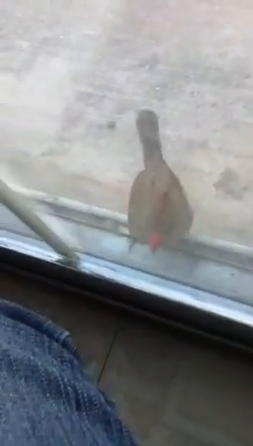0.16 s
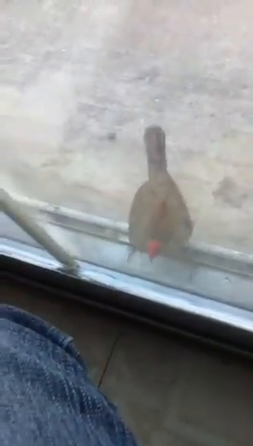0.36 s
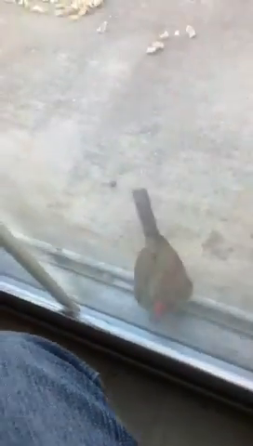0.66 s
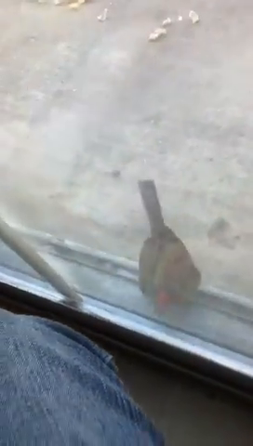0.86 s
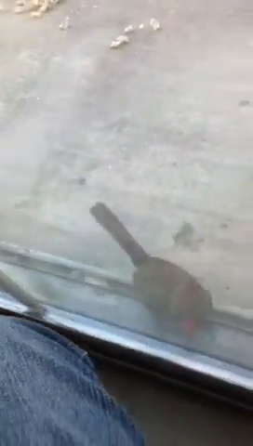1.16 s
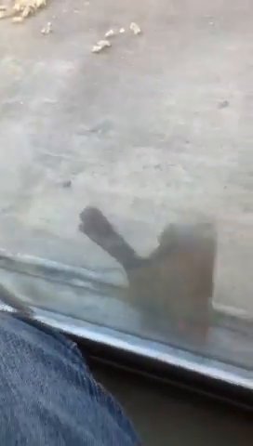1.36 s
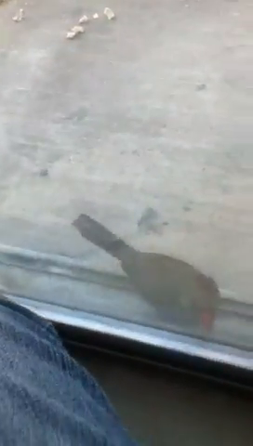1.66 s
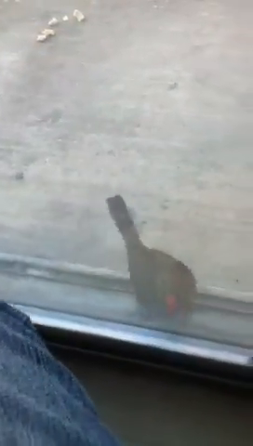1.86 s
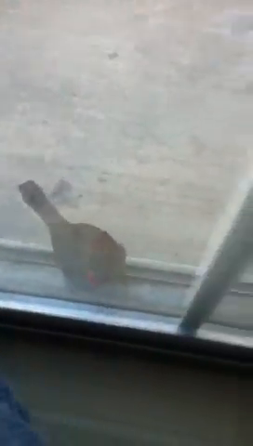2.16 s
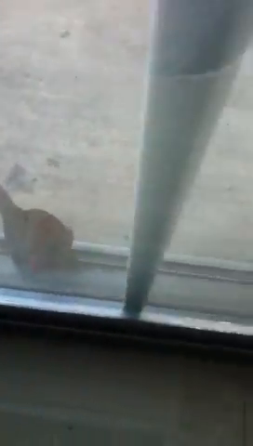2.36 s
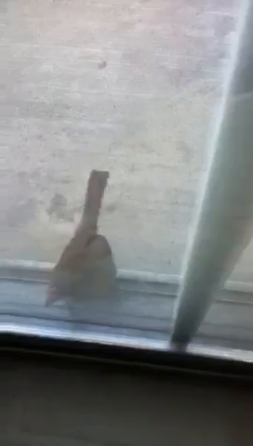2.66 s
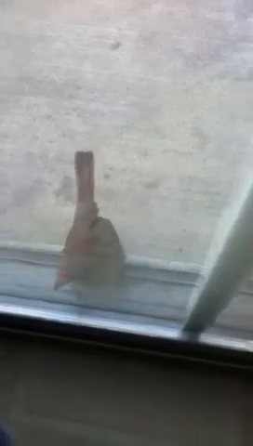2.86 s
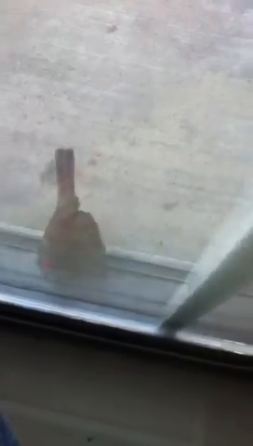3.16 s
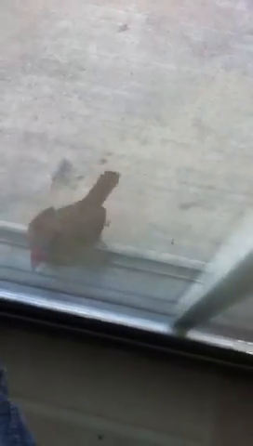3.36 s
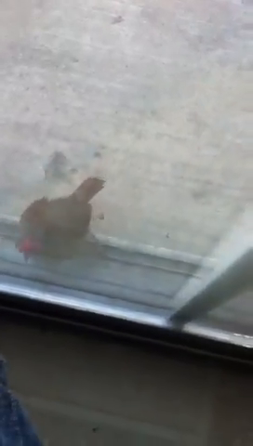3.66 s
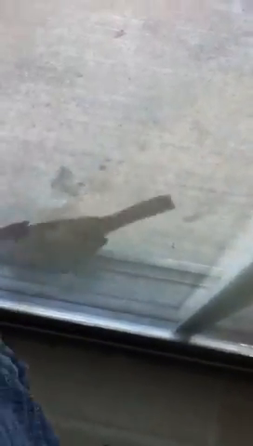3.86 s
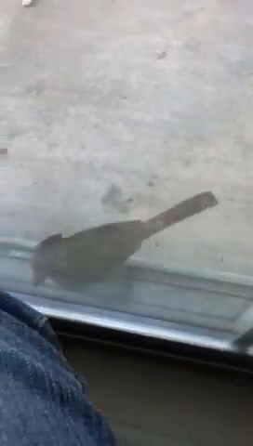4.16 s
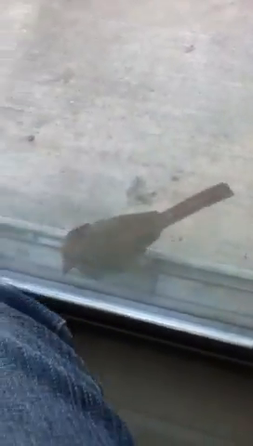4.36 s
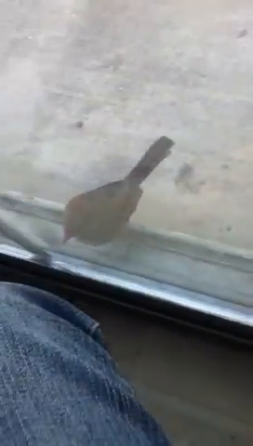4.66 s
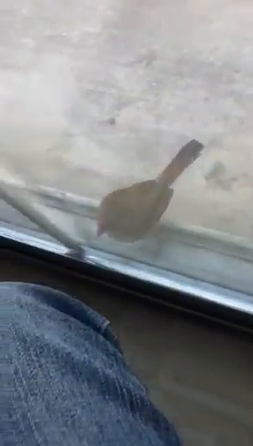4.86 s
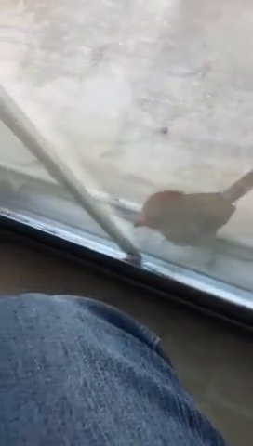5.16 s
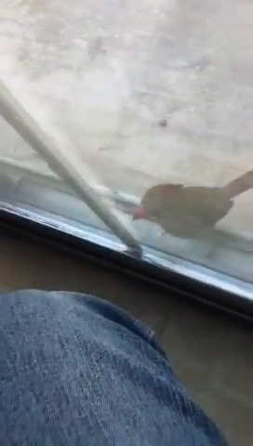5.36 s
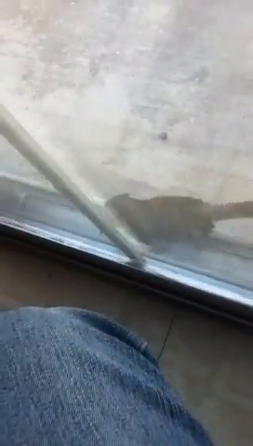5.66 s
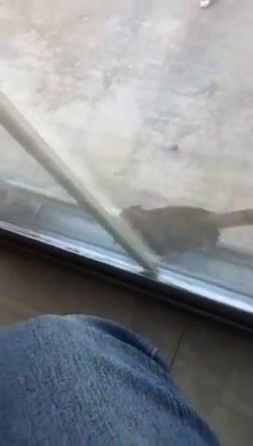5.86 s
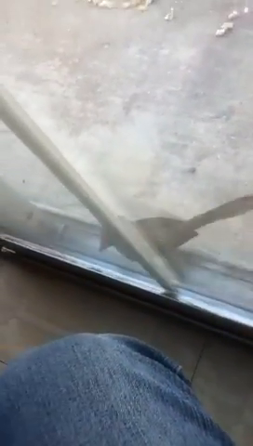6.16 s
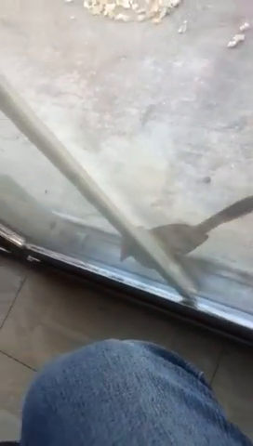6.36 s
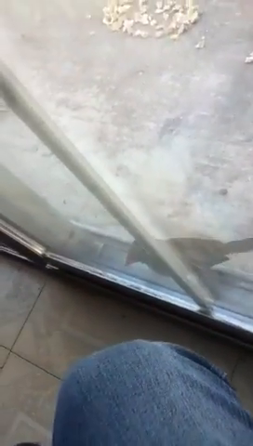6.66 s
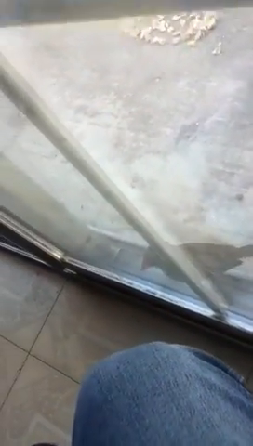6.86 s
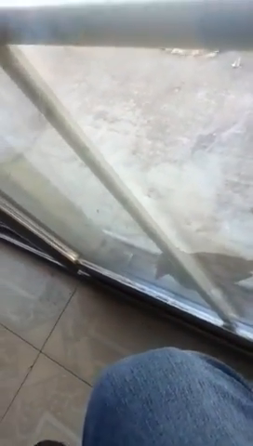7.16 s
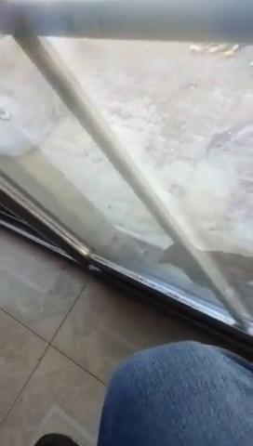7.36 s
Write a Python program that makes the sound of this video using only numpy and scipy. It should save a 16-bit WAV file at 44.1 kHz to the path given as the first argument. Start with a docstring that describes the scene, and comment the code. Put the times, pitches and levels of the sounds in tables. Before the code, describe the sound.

Heard from a phone just inside a glass door, a low electrical hum and soft room noise run throughout. Close by, a bird taps its beak unevenly on the pane, its claws ticking on metal and its wings brushing briefly. Muffled paired thuds indoors fade out and are followed by a single loud knock at the door frame. More pecks follow, then a few faint scuffs from farther into the room.

```python
"""Just inside a glass door, a phone microphone picks up steady mains hum and soft room noise.
Outside, a bird starts pecking: bending waves cross the pane and return as tiny falling chirps,
while claws tick on the metal sill, wings flick and the frame pings. Indoors, soft double thuds
on the floor die away, then one hard knock sounds by the door. The bird pecks on, and near the end
a few scuffs come from farther into the room."""
import sys
import numpy as np
from scipy import signal
from scipy.fft import rfft, irfft, next_fast_len
from scipy.io import wavfile
from scipy.ndimage import uniform_filter1d

SR = 44100
rng = np.random.default_rng(int(sys.argv[2]) if len(sys.argv) > 2 else 0)


def to_wav(sig):
    """Store sig (one row per channel, or 1-D mono) as 16-bit WAV at the path in sys.argv[1].

    Samples outside -1..1 are clipped; the rate is SR.
    """
    pcm = np.clip(np.atleast_2d(sig), -1, 1) * 32767
    pcm = np.round(pcm).astype(np.int16)
    wavfile.write(sys.argv[1], SR, pcm.T)  # frames by channels


N = 330750
T = np.arange(int(.5 * SR)) / SR  # time within one event

# beak on the pane: start_s, level_db, hardness_db (tick over body)
PECKS = [(.652, -40, 0), (1.085, -41.5, -3), (1.49, -48, -3.5), (2.729, -41.5, -9.5), (3.063, -43.5, -6.5),
         (3.381, -28.5, -1), (3.899, -38.5, -3), (4.14, -57, 3.5), (4.224, -50, 5.5), (4.5702, -48, 2.5),
         (5.027, -45.5, -5), (5.6986, -44.5, 2), (6.186, -48, 0)]
# bending waves back from the pane's edges: travel_s (at 1 kHz), gain_db
PANE_PATHS = [(.0025, -2.5), (.0075, -5), (0.0117, 2.5), (.021, 2.5)]
# claws on the sill outside: start_s, level_db, pitch_hz (of the struck spot)
CLAWS = [(.688, -57, 808), (1.096, -53, 1733), (1.138, -51.5, 3270), (1.524, -52, 5200),
         (2.787, -50.5, 1340), (3.4584, -51, 4800), (3.4835, -44, 4040), (3.924, -46.5, 4270),
         (3.943, -53.5, 10300), (4.224, -51.5, 10300), (4.614, -45.5, 1850), (4.632, -50.5, 10200),
         (5.644, -55, 10500), (5.666, -53, 837), (5.729, -51, 4030), (6.216, -53, 3940),
         (6.258, -52.5, 1016)]
# flicks of the wings: centre_s, level_db
FLICKS = [(.636, -59), (1.094, -60), (1.3, -63.5), (1.842, -54), (3.571, -51.5), (3.721, -59),
          (3.882, -56.5), (3.96, -53.5), (4.466, -56), (5.665, -58)]
# faint rustle between the flicks: time_s, level_db
RUSTLE = [(0, -78), (.5, -67.5), (1.3, -69), (2.5, -62.5), (3.05, -63.5), (3.7, -63.5), (4.2, -63.5),
          (4.8, -67.5), (5.9, -70.5), (6.44, -61.5), (6.85, -76)]
# small metal parts of the door frame: start_s, pitch_hz, level_db, t60_s
PINGS = [(1.1, 2775, -58, .35), (2.597, 2000, -44.5, 0.0056)]
# double thuds indoors, perhaps feet shifting: start_s, push_s, first_db, gap_s, second_db
THUDS = [(1.566, 0.018, -19, 0.1, -17), (1.908, 0.02, -26, 0.058, -26), (2.127, 0.018, -35.5, .057, -31),
         (2.312, 0.0032, -38, .056, -43.5), (2.406, 0.022, -54, 0.05, -42.5)]
# hard knock by the door: start_s, push_s, t60_s, bass_db, middle_db, treble_db
KNOCKS = [(2.806, 0.0012, 0.31, -14, -27, -33.5)]
# scuffs farther into the room: start_s, push_s, bass_db, tilt_db (per register)
SCUFFS = [(5.852, 0.028, -50.5, -5), (5.893, 0.0059, -44.5, -2.5), (6.527, 0.016, -35.5, -7.5),
          (7.47, .01, -45.5, -13)]
# partials of the mains hum: harmonic_number, rms_db
HUM_PARTIALS = [(1, -44.5), (2, -65)]

# resonances of the sill, the floor and the knocked frame: pitch_hz, gain_db
SILL_MODES = [(835, 8.5), (1190, 2), (1915, 4.5), (2780, 2), (3220, -0.5), (3890, 10.5), (4380, -0.5),
              (6300, -19), (6800, 5), (8590, -2), (9980, -5), (10250, -13), (10960, -10)]
FLOOR_MODES = [(108, -9.5), (165, -10), (194, 3), (229, 0), (304, -4), (390, -2), (452, -19), (528, -13.5),
               (576, -9.5), (627, -13), (662, -12.5), (754, -23), (802, -21), (1284, -31), (1424, -20),
               (1908, -23)]
FRAME_MODES = [(121, -6.5), (196, 1), (264, -6), (318, -10), (412, -11.5), (579, -22), (622, -20),
               (824, -26), (1058, -28), (1305, -28), (1378, -30), (1564, -39), (1776, -28), (1814, -25),
               (1873, -32), (1973, -28), (2054, -27), (2374, -49)]

# tone colour of each source at the microphone: frequency_hz, gain_db
PECK_COLOUR = [(60, -25), (130, -0.5), (230, 11.5), (450, -4), (580, 0.5), (950, -9.5), (1900, -8),
               (2900, -14), (4000, -15), (5200, -17.5), (6200, -21.5), (15000, -39)]
CLAW_COLOUR = [(300, -20), (850, 10.5), (1900, 5.5), (2700, 0), (4200, 13), (5600, 4), (10500, 12),
               (13000, -5), (16000, 1)]
WING_COLOUR = [(300, -11), (1200, 16.5), (4000, 11), (6000, 9.5), (8200, 8), (11000, 3), (16000, -11)]
THUD_COLOUR = [(35, -59), (60, -34), (107, -2), (190, 2.5), (324, -3.5), (408, 0.5), (491, -14),
               (663, -17.5), (875, -29.5), (1300, -30), (1520, -35), (5430, -41.5), (15000, -62)]
KNOCK_COLOUR = [(50, -65), (105, -14), (199, -2), (355, -11.5), (408, -6), (503, -20), (564, -19.5),
                (875, -26.5), (1800, -28.5), (3580, -35.5), (6090, -30.5), (11500, -43.5), (15000, -63)]
SCUFF_COLOUR = [(70, -26), (170, 4), (250, -5), (420, -0.5), (680, -3), (800, -10), (1050, -3.5),
                (1700, -14.5), (2200, -30.5), (3300, -31.5), (8000, -42.5), (15000, -51)]
ROOM_COLOUR = [(20, -20), (45, -10.5), (80, -1), (120, 0), (180, 3.5), (240, -7), (310, 2), (480, -11),
               (640, -8.5), (900, -16.5), (1800, -21), (4000, -26), (10000, -29), (15500, -33.5)]


def peck(body_db, tick_db, loss_db_per_s=220, stray_db=-7):
    """Close on the glass: a tick, then bending waves whose speed grows with the root of frequency."""
    hz = np.arange(len(T) // 2 + 1) * SR / len(T)
    root_khz = np.sqrt(hz / 1000)
    # many weaker echoes bounce between the edges
    strays = [(.005 + .035 * u, stray_db) for u in rng.random(size=14)]
    pane = np.ones(len(hz), complex)
    for travel_s, db in list(PANE_PATHS) + strays:
        travel_s *= 1 + 0.0496 * rng.standard_normal()
        cycles = 2000 * travel_s * root_khz + rng.random()  # treble returns first
        pane += undb(db - loss_db_per_s * travel_s * root_khz) * np.exp(-2j * np.pi * cycles)
    chirps = irfft(pane, len(T)) * fade(1.0)
    # the pane's low modes ring on, and the room answers
    tail = cut(rng.standard_normal(len(T)), "low", 1100, order=2) * fade(0.55)
    room = rng.standard_normal(len(T)) * fade(0.4)
    sound = sum(energy(tint(part, PECK_COLOUR), db) for part, db in [(chirps, 0), (tail, -8), (room, -18)])
    # a harder peck is a briefer contact and cracks more
    crack = undb(tick_db + 42.5) * resonate(sound, 3100, q=2)
    return balance(sound + crack, [900], [body_db, tick_db])


def claw(db, pitch_hz, even_hz=6500, tilt_db_per_octave=2.5, skid_t60_s=0.057):
    """A claw strikes and skids briefly, ringing the sill most at the pitch of that spot."""
    skid = rng.standard_normal(len(T)) * fade(skid_t60_s) * (1 - np.exp(-T / 0.0004))
    modes = ring(SILL_MODES, t60_s=0.14, scatter_db=4, damping_slope=0.59)
    sill = signal.fftconvolve(skid, modes)[:len(T)]
    spot = resonate(skid, pitch_hz, q=28)
    room = tint(rng.standard_normal(len(T)) * (fade(0.096) - fade(skid_t60_s)), CLAW_COLOUR)
    sound = energy(tint(skid, CLAW_COLOUR)) + energy(sill, -8) + energy(spot, -5) + energy(room, -12)
    # a stiffer spot has a higher pitch and a brighter tick
    tilt_db = tilt_db_per_octave * np.log2(pitch_hz / even_hz)
    return balance(sound, [2500, 6000], [db - tilt_db, db + 1, db + tilt_db])


def wings(half_width_s=0.028):
    """Feathers brush the air outside in short swells, over a faint rustle."""
    t = np.arange(N) / SR
    flick_power = sum(undb(db) ** 2 * np.exp(-((t - s) / half_width_s) ** 2) for s, db in FLICKS)
    rustle_power = undb(np.interp(t, *np.transpose(RUSTLE))) ** 2
    return np.sqrt(flick_power + rustle_power) * unit(tint(rng.standard_normal(N), WING_COLOUR))


def ping(pitch_hz, db, t60_s):
    """A brief rub rings one mode of a small metal part of the door frame."""
    rub = rng.standard_normal(len(T)) * fade(0.15)
    mode = np.sin(2 * np.pi * pitch_hz * T) * fade(t60_s)
    return balance(signal.fftconvolve(rub, mode)[:len(T)], [], [db])


def thud(push_s, t60_s, levels_db):
    """One soft contact rings the floor on the microphone's side of the door."""
    floor = ring(FLOOR_MODES, t60_s=0.36, scatter_db=1.5, damping_slope=0.24)
    return blow(push_s, t60_s, levels_db, floor, THUD_COLOUR, ring_db=-5.5, treble_life=1.18, rattle_db=1)


def first_contact(push_s, db):
    """The first half of a double thud brushes the floor."""
    return thud(push_s, t60_s=0.28, levels_db=[db, db - 8.5, db - 23])


def second_contact(db, heavy_db=-17.5, heavy_push_s=0.012):
    """The second half lands dully: slow to settle if heavy, briefer and brighter if light."""
    lighter_db = heavy_db - db
    lift_db = 0.19 * lighter_db
    levels_db = [db, db - 12.5 + lift_db, db - 34.5 + lift_db]
    return thud(heavy_push_s * undb(-lighter_db), t60_s=0.27, levels_db=levels_db)


def knock(push_s, t60_s, levels_db):
    """A hard blow by the door rings the frame."""
    frame = ring(FRAME_MODES, t60_s=0.24, scatter_db=4, damping_slope=0.14)
    return blow(push_s, t60_s, levels_db, frame, KNOCK_COLOUR, ring_db=7, treble_life=1, rattle_db=1.2)


def scuff(push_s, bass_db, tilt_db, t60_s=0.54):
    """A scuff on the floor, farther from the microphone; its treble dies first."""
    floor = ring(FLOOR_MODES, t60_s=0.52, scatter_db=1, damping_slope=0.094)
    levels_db = bass_db + tilt_db * np.arange(3)
    return blow(push_s, t60_s, levels_db, floor, SCUFF_COLOUR, ring_db=-5, treble_life=.68, rattle_db=.5)


def room_tone(hum_hz=120.1, waver_db=0.27, air_db=-51.5, drift_db=0.18):
    """An appliance hums at twice the mains rate over the soft rush of the room."""
    phase = 2 * np.pi * np.cumsum(hum_hz + 0.11 * drift(2.16)) / SR
    hum = sum(undb(db) * np.sqrt(2) * np.sin(round(k) * phase) for k, db in HUM_PARTIALS)
    air = unit(tint(rng.standard_normal(N), ROOM_COLOUR))
    return hum * undb(waver_db * drift(3.4)) + air * undb(air_db + drift_db * drift(11))


def blow(push_s, t60_s, levels_db, ringing, colour, ring_db, treble_life, rattle_db):
    """A contact builds over the push: modes plus a dense tail whose treble rattles and has its own decay."""
    swell = np.minimum(T / max(push_s, 1e-3), 1)
    noise = rng.standard_normal(len(T))
    lows = cut(noise, "low", 1000, order=2) * swell * fade(t60_s, hold_s=push_s)
    highs = cut(noise, "high", 1000, order=2) * np.sqrt(swell) * fade(t60_s * treble_life, hold_s=push_s)
    rattle = undb(rattle_db * drift(165)[:len(T)])
    tail = tint(lows - highs * rattle, colour)
    # the heavy parts take a few cycles to get moving and radiate no deep bass
    onset = 1 - np.exp(-(T / (push_s + 0.006)) ** 2)
    modes = cut(ringing * onset, "high", 92)
    return balance(energy(tail) + energy(modes, ring_db), [700, 2500], levels_db)


def ring(modes, t60_s, scatter_db, damping_slope):
    """Decaying modes, the high ones shorter; each blow lands elsewhere and weights them anew."""
    lowest_hz = modes[0][0]
    out = 0
    for hz, db in modes:
        scatter, polarity = rng.standard_normal(2)
        gain = undb(db + scatter_db * scatter) * np.sign(polarity)
        out += gain * np.sin(2 * np.pi * hz * T) * fade(t60_s * (lowest_hz / hz) ** damping_slope)
    return out


def balance(x, splits_hz, levels_db):
    """Set each register's rms level over its loudest 10 ms."""
    out = 0
    for k, db in enumerate(levels_db):
        band = x
        if k > 0:
            band = cut(band, "high", splits_hz[k - 1])
        if k < len(splits_hz):
            band = cut(band, "low", splits_hz[k])
        out += band * undb(db) / np.sqrt(uniform_filter1d(band ** 2, size=441).max())
    return out


def tint(x, colour):
    """Causal filter that follows a tone colour."""
    size = next_fast_len(len(x) + 4096, real=True) * 2
    hz, db = np.transpose(colour)
    bins_hz = np.arange(size // 2 + 1) * SR / size
    shape_db = np.interp(np.log(bins_hz + 1), np.log(hz), db)
    cepstrum = irfft(np.log(undb(shape_db)))
    # minimum phase: nothing sounds ahead of the strike
    cepstrum[1:size // 2] *= 2
    cepstrum[size // 2 + 1:] = 0
    return irfft(rfft(x, size) * np.exp(rfft(cepstrum)))[:len(x)]


def cut(x, keep, hz, order=4):
    """Keep the "low" or "high" side of a frequency."""
    return signal.sosfilt(signal.butter(order, hz, keep, fs=SR, output="sos"), x)


def resonate(x, hz, q):
    """Pass through one resonance."""
    return signal.lfilter(*signal.iirpeak(hz, q, fs=SR), x)


def fade(t60_s, hold_s=0):
    """Hold, then fall 60 dB in t60_s."""
    return np.exp(-np.log(1000) * np.maximum(T - hold_s, 0) / t60_s)


def drift(rate_hz):
    """Smooth random drift, spread 1."""
    step = int(SR / rate_hz)
    stairs = np.repeat(rng.standard_normal(N // step + 1), step)
    return unit(uniform_filter1d(stairs, step)[:N])


def undb(db):
    """Decibels to gain."""
    return 10 ** (np.asarray(db) / 20)


def unit(x):
    """Scale to rms 1."""
    return x / np.std(x)


def energy(x, db=0):
    """Scale to a total energy."""
    return x * undb(db) / np.linalg.norm(x)


def add(track, start_s, x):
    """Mix an event in at its time."""
    start = int(start_s * SR)
    track[start:start + len(x)] += x[:N - start]


def scene():
    """From one spot inside the door: bird close by, thuds and scuffs in the room, hum behind."""
    out = room_tone() + wings()
    for start_s, db, hardness_db in PECKS:
        add(out, start_s, peck(db, db + hardness_db))
    for start_s, db, pitch_hz in CLAWS:
        add(out, start_s, claw(db, pitch_hz))
    for start_s, pitch_hz, db, t60_s in PINGS:
        add(out, start_s, ping(pitch_hz, db, t60_s))
    for start_s, push_s, first_db, gap_s, second_db in THUDS:
        add(out, start_s, first_contact(push_s, first_db))
        add(out, start_s + gap_s, second_contact(second_db))
    for start_s, push_s, t60_s, *levels_db in KNOCKS:
        add(out, start_s, knock(push_s, t60_s, levels_db))
    for start_s, push_s, bass_db, tilt_db in SCUFFS:
        add(out, start_s, scuff(push_s, bass_db, tilt_db))
    return out[None]


def record(dry):
    """The phone cuts the top of the treble."""
    top_hz = 15850
    return signal.sosfilt(signal.ellip(10, .2, 70, top_hz, fs=SR, output="sos"), dry)


dry = scene()
out = record(dry)
to_wav(out)
```